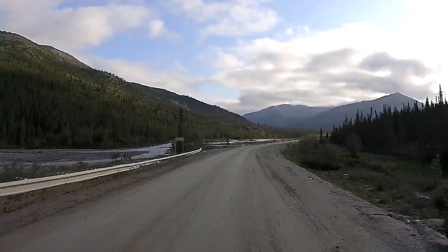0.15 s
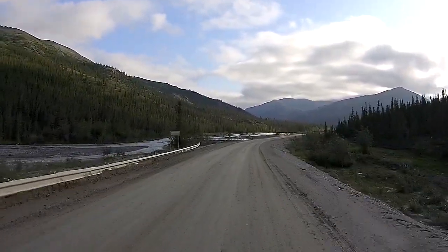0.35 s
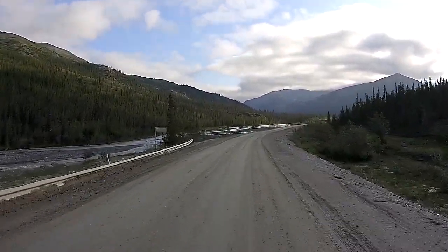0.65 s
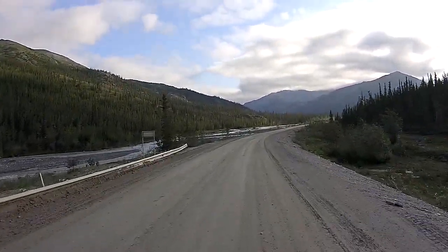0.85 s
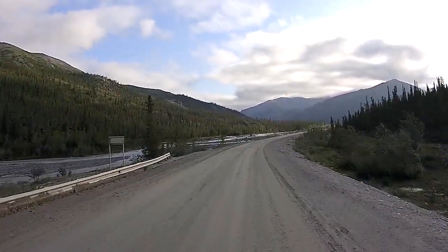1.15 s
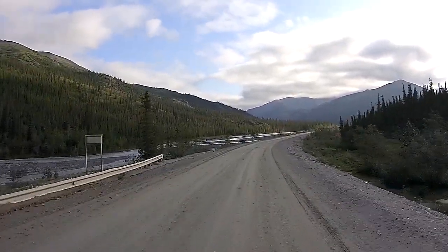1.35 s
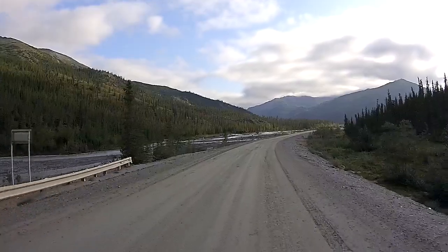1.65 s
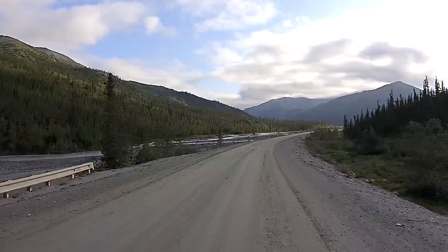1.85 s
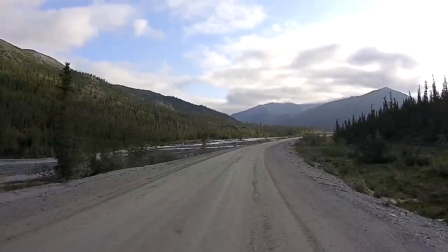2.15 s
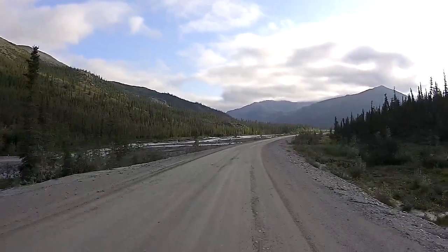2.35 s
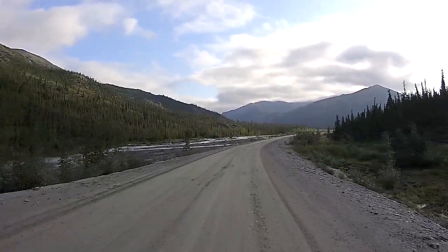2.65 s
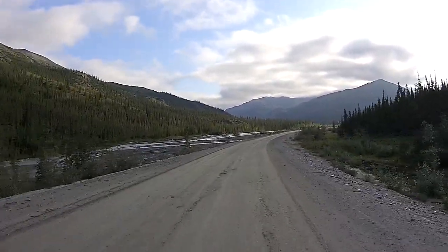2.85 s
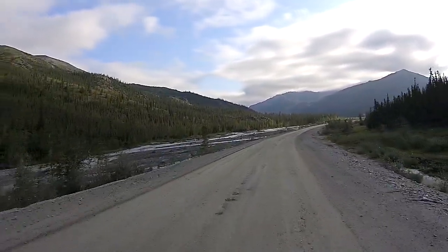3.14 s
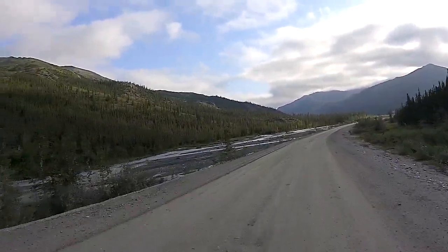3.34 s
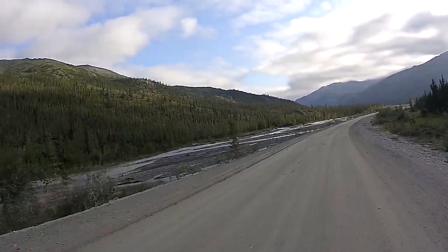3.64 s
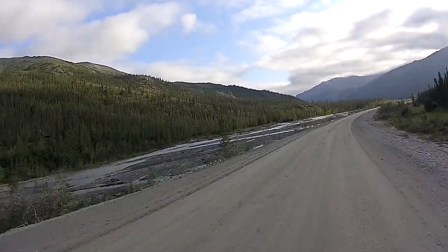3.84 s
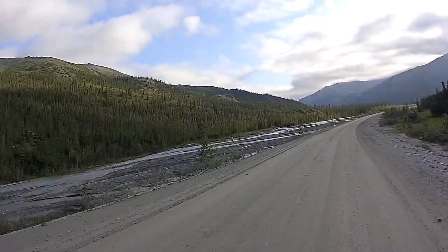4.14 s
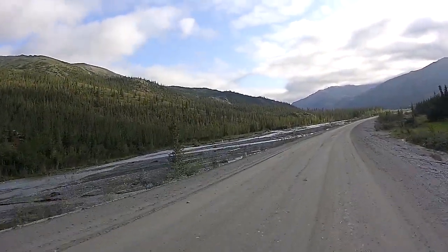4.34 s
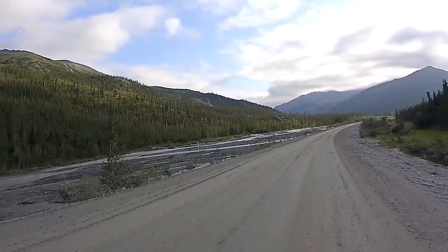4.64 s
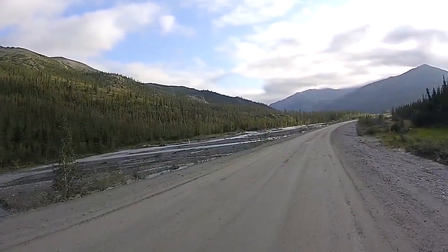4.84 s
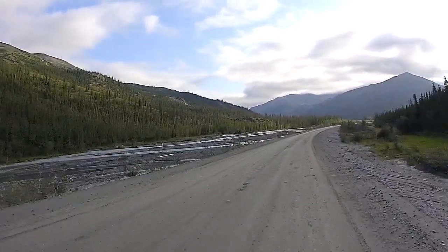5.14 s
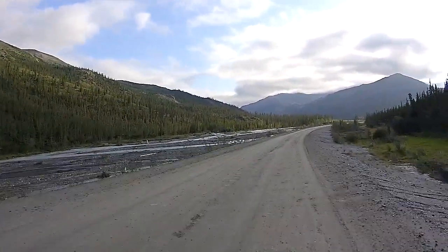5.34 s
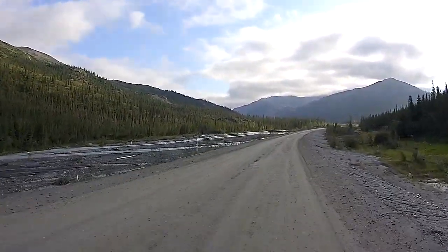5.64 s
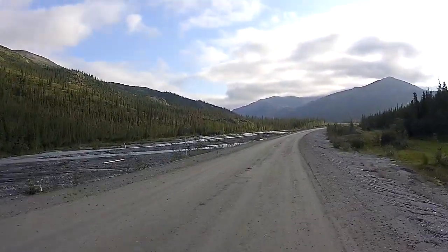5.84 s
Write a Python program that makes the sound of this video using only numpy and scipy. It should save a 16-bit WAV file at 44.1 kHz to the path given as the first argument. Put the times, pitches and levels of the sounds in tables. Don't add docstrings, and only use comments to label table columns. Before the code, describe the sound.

A vehicle rolls on a gravel road: bright gritty crunching and stone ticks, a brief quiet gap, then renewed crackling.

```python
import sys
import numpy as np
from scipy import signal
from scipy.fft import rfft, irfft
from scipy.io import wavfile
from scipy.ndimage import uniform_filter1d

SR = 44100
rng = np.random.default_rng(int(sys.argv[2]) if len(sys.argv) > 2 else 0)


def decibels_to_gain(level_db):
    exponent = np.asarray(level_db, float) / 20
    return 10 ** exponent


def waveform_to_disk(signal):
    frames = np.transpose(np.atleast_2d(signal))
    scaled = np.clip(frames, -1, 1) * 32767
    samples = np.round(scaled).astype(np.int16)
    wavfile.write(sys.argv[1], SR, samples)


N = 264157

# time_s [s], level_db [dB]
GRAVEL_DEPTH = [(0.0, -33), (0.2, -31.5), (0.3, -29.5), (0.72, -30), (0.96, -31), (1.35, -30), (1.9, -31.5),
                (2.8, -30), (3.26, -31.5), (3.45, -44), (3.7, -50.5), (4.1, -63), (4.4, -63), (4.5, -54.5),
                (4.92, -46), (5.06, -40), (5.5, -35), (5.99, -35)]
# time_s [s], treble_lift_db [dB]
STONE_FINENESS = [(0, -0.8), (.9, -1.5), (1.4, -0.1), (3.2, -0.1), (3.6, 3), (4.2, -1), (4.7, -1.5),
                  (5.1, 1.5), (5.99, 1.5)]
# start_s [s], lift_db [dB]
GRAVEL_RIDGES = [(.02, 5.5), (.28, 0.5), (.56, 3), (.67, 3.5), (.87, 2), (1.0, 3.5), (1.075, 5),
                 (1.11, -0.5), (1.18, 4), (1.39, -1.5), (1.5, 1.5), (1.67, 2.5), (1.78, 2), (1.94, 2),
                 (2.03, 1), (2.17, 2), (2.37, 0.5), (2.6, 1), (2.71, 1.5), (2.93, 0.5), (3.24, 1),
                 (5.56, 4), (5.69, 1), (5.845, 2.5)]
# start_s [s], lift_db [dB]
LOOSE_PATCHES = [(3.39, 1), (3.53, 2.5), (3.59, 2.5), (3.63, 1.5), (3.78, 5), (3.88, 4), (3.98, 5),
                 (4.45, 7.5), (4.585, 6), (4.615, 3), (4.655, 7), (4.69, 2.5), (4.73, 2.5), (4.86, 0.5),
                 (4.948, 7.5), (5.055, 6), (5.165, 1), (5.395, 2), (5.94, 2)]
# frequency_hz [Hz], density_db [dB per Hz]
CASE_COLOUR = [(180, -70), (300, -30), (872, -21.5), (1270, -13), (1570, -13.5), (2990, -0.5), (3410, 0.5),
               (4150, -1), (6150, -10), (7490, -18.5), (10900, -41.5), (11800, -42.5), (15200, -45)]
# frequency_hz [Hz], density_db [dB per Hz]
THIN_COLOUR = [(180, -54), (300, -19), (569, -12.5), (978, -11.5), (1890, -8), (4150, -1.5), (6050, -3),
               (7870, -11), (10600, -30), (15200, -31)]
# start_s [s], peak_db [dB], pitch_hz [Hz]
DEEP_STONES = [(0.0248, -16, 3800), (0.286, -19, 3250), (0.398, -11, 3170), (0.4813, -9.5, 3470),
               (0.5466, -18, 3610), (0.5763, -17, 3870), (0.683, -10, 3250), (0.6865, -12, 3250),
               (0.711, -9, 3660), (0.779, -11, 3150), (0.818, -7, 3360), (0.97, -9.5, 3180),
               (0.9795, -9, 3310), (1.0206, -13, 3210), (1.089, -16, 3290), (1.1735, -8, 4170),
               (1.2002, -12, 3330), (1.4325, -12, 3030), (1.687, -16, 3860), (1.8313, -30, 3540),
               (2.092, -11, 3440), (2.2282, -15, 4000), (2.2454, -10, 3440), (2.2852, -15, 3800),
               (2.374, -15, 3500), (2.7077, -10, 3060), (2.8765, -13, 3860), (2.9395, -12, 2940),
               (2.989, -12, 3340)]
# start_s [s], peak_db [dB], pitch_hz [Hz]
STRAY_STONES = [(3.337, -19, 4590), (3.363, -30, 4160), (3.4758, -27, 3240), (3.536, -29, 5120),
                (3.564, -26, 3950), (3.594, -18, 4800), (3.623, -26, 3920), (3.684, -32, 3770),
                (3.7352, -28, 4790), (3.8947, -27.5, 5380), (4.4503, -33, 2600), (4.5835, -25, 4150),
                (4.6192, -30, 4100), (4.662, -28, 4300), (4.6827, -23, 4230), (4.735, -21.5, 3300),
                (4.8326, -33, 5700), (4.87, -27, 2930)]
# start_s [s], peak_db [dB], pitch_hz [Hz]
RETURN_STONES = [(4.9515, -16, 5230), (4.997, -29, 3090), (5.065, -16, 3940), (5.0894, -25, 3480),
                 (5.1084, -20, 3930), (5.1702, -10.5, 4280), (5.215, -17, 2920), (5.358, -14.5, 3900),
                 (5.3998, -11.5, 4100), (5.446, -26, 3780), (5.468, -14, 3970), (5.5114, -19, 3550),
                 (5.569, -14, 4200), (5.689, -10, 4000), (5.704, -12, 4000), (5.73, -19, 4500),
                 (5.7604, -14, 3900), (5.8242, -24, 3510), (5.848, -16, 4330), (5.8685, -23, 4200)]
# start_s [s], lift_db [dB]
GRIT_SPRAYS = [
    (.585, 2),
    (.71, 2),
    (.815, -2),
    (1.115, 12),
    (1.95, 7),
    (2.09, 3),
    (2.74, -2),
    (3.595, 10),
    (5.165, 8),
]
# start_s [s], peak_db [dB], pitch_hz [Hz], t60_s [s], low_edge_hz [Hz]
CASE_KNOCKS = [
    (.648, -28, 1300, .003, 800),
    (.6795, -21, 1500, .003, 750),
    (3.2935, -29, 1300, .003, 800),
    (3.7517, -34.5, 560, .004, 90),
]
# time_s [s], pitch_hz [Hz]
NINTH_ORDER = [(0, 259.4), (.65, 261.7), (1.4, 262.2), (1.6, 263), (2.7, 257), (3.4, 256.3), (3.8, 255.4),
               (5.5, 259.2), (5.99, 257)]
# frequency_hz [Hz], density_db [dB per Hz]
RUMBLE_COLOUR = [(8, 3), (25, -8.5), (60, -1), (134, -1), (230, 1.5), (300, -1.5), (500, -12), (900, -30),
                 (2000, -90)]
# pitch_hz [Hz], width_hz [Hz], level_db [dB]
BODY_PANELS = [
    (68, 32, 2.5),
    (162.3, 20, 3),
]
# start_s [s], rumble_lift_db [dB]
WHEEL_BUMPS = [(.05, 3), (.8, 11), (1.07, 3), (1.47, 7), (1.93, 8), (3.52, 9), (3.58, 6), (3.82, 6),
               (3.88, 5), (4.1, 5), (5.55, 4), (5.9, 1)]
# frequency_hz [Hz], density_db [dB per Hz]
AIR_COLOUR = [(240, -28), (400, -12), (651, -11), (1080, -6.5), (1670, -11), (2640, -3.5), (2980, -3),
              (6280, -7), (10900, -32), (15200, -30)]

DEEP_DB, THIN_DB = -31.5, -50.5
HUM_DB, RUMBLE_DB = -73, -66.5
GAIN_OPENS_DB = 4


def rms_one(x):
    return x / np.sqrt(np.mean(x ** 2) + 1e-20)


def in_time(rows):
    time_s, *columns = np.transpose(rows)
    return [np.interp(np.arange(N) / SR, time_s, column) for column in columns]


def coloured(x, points):
    spectrum = rfft(x)
    hz = np.arange(N // 2 + 1) * SR / N + 1
    own = np.sqrt(uniform_filter1d(np.abs(spectrum) ** 2, size=3001))
    point_hz, point_db = np.transpose(points)
    wanted = decibels_to_gain(np.interp(np.log(hz), np.log(point_hz), point_db))
    return rms_one(irfft(spectrum / own * wanted, N))


def drift(rate_hz):
    r = np.exp(-2 * np.pi * rate_hz / SR)
    noise = rng.standard_normal(N + SR)
    return rms_one(signal.lfilter([1], [1, -2 * r, r * r], noise)[SR:])


def ring(clicks, hz, t60_s):
    r = decibels_to_gain(-60 / (t60_s * SR))
    w = 2 * np.pi * hz / SR
    return signal.lfilter([0, np.sin(w)], [1, -2 * r * np.cos(w), r * r], clicks + 1e-18)


def resonance(x, hz, width_hz):
    r = np.exp(-np.pi * width_hz / SR)
    top = np.array([1, 0, -1]) * (1 - r * r) / 2
    return signal.lfilter(top, [1, -2 * r * np.cos(2 * np.pi * hz / SR), r * r], x)


def butter(x, order, hz, kind):
    return signal.sosfilt(signal.butter(order, hz, kind, fs=SR, output="sos"), x)


def butter_even(x, hz, kind):
    return signal.sosfiltfilt(signal.butter(2, hz, kind, fs=SR, output="sos"), x)


def swells(rows, rise_s, fade_s):
    start_s, lift_db = np.transpose(rows)[:, :, None]
    since = np.maximum(np.arange(0, N + 32, 32) / SR - start_s, 0)
    shape = (1 - np.exp(-since / rise_s)) * np.exp(-since / fade_s) * 1.6
    return np.repeat((lift_db * shape).sum(axis=0), repeats=32)[:N]


def crackle(level_db, brightness_db):
    deep = np.clip((level_db - THIN_DB) / (DEEP_DB - THIN_DB), 0, 1)
    clumps_db = 0.87 * drift(42) + 2.3 * drift(155)
    clumps = decibels_to_gain(clumps_db * (0.5 - 0.5 * deep))

    cracks_per_s = 3500.0 * (0.3 + 0.7 * deep)
    born = rng.random(N) < cracks_per_s / SR
    sizes = decibels_to_gain(2.5 * np.minimum(rng.exponential(1, N), 4.2))
    sizes = sizes * rng.choice([-1, 1], N) / np.sqrt(0.53 + 0.4 * deep)
    pitches_hz = np.geomspace(900, 12000, num=10)
    dealt = rng.integers(0, 10, N)
    small = 0
    for k, hz in enumerate(pitches_hz):
        small = small + rms_one(ring(sizes * born * (dealt == k), hz, 2.2 / hz))

    dust = 0.4 * rng.standard_normal(N)
    cracks = clumps * (rms_one(small) + dust)
    cracks = cracks / np.sqrt(uniform_filter1d(cracks ** 2, size=2600))
    heard = deep * coloured(cracks, CASE_COLOUR) + (1 - deep) * coloured(cracks, THIN_COLOUR)
    low = butter_even(heard, 3500, "low")
    top = butter_even(heard, 7000, "high")
    middle = heard - low - top
    return decibels_to_gain(level_db) * (low * decibels_to_gain(-brightness_db) + middle * decibels_to_gain(brightness_db) + top)


def sprays(gravel):
    top = butter_even(gravel, 7000, "high")
    return top * (decibels_to_gain(swells(GRIT_SPRAYS, rise_s=0.004, fade_s=0.016)) - 1)


def stones():
    rows = [(*row, 0.0057) for row in DEEP_STONES]
    rows += [(*row, 0.005) for row in STRAY_STONES + RETURN_STONES]
    length = 1500
    out = np.zeros(N + length)
    since = np.arange(length) / SR
    for start_s, peak_db, hz, splinter_s in rows:
        blow = 0.16 * rng.laplace(size=length) * np.exp(-since / splinter_s)
        blow[0] = 0.51
        at = round(start_s * SR)
        out[at:at + length] += decibels_to_gain(peak_db - 6.0) * ring(blow, hz, 4.2 / hz)
    return butter(out[:N], 3, [1700, 7000], "band")


def knock():
    out = 0
    for start_s, peak_db, hz, t60_s, edge_hz in CASE_KNOCKS:
        push = np.exp(-((np.arange(N) / SR - start_s) / 0.0001) ** 2)
        blow = decibels_to_gain(peak_db) * ring(push / push.sum(), hz, t60_s) * 1.5
        out = out + butter(blow, 3, edge_hz, "high")
    return out


def engine(ninth_hz, hum_db, open_db):
    turns = np.cumsum(ninth_hz / 9) / SR
    hum_level = np.sqrt(2) * decibels_to_gain(hum_db + 0.9 * drift(1.5))
    hum = hum_level * np.sin(18 * np.pi * turns + 0.49 * drift(4.0))

    throb = 1 + 0.27 * np.cos(2 * np.pi * turns) + 0.5 * np.cos(4 * np.pi * turns)
    throb = throb + 0.84 * np.cos(6 * np.pi * turns)
    mesh_order = 91.8
    whine = throb * np.sin(2 * np.pi * mesh_order * turns + 0.4 * drift(5))

    rattle_hz = 2590
    shaken = rng.standard_normal(N) * decibels_to_gain(1.6 * drift(60))
    rattle = rms_one(resonance(resonance(shaken, rattle_hz, 260), rattle_hz, 600))
    return hum + decibels_to_gain(open_db) * (decibels_to_gain(-1) * whine + decibels_to_gain(-3.5) * rattle)


def road(rumble_db):
    shake = coloured(rng.standard_normal(N) * decibels_to_gain(0.5 * drift(31)), RUMBLE_COLOUR)
    body = shake
    for hz, width_hz, panel_db in BODY_PANELS:
        body = body + decibels_to_gain(panel_db) * resonance(shake, hz, width_hz)
    return decibels_to_gain(rumble_db) * rms_one(body)


def air_rush(level_db):
    return decibels_to_gain(level_db) * coloured(rng.standard_normal(N) * decibels_to_gain(0.7 * drift(50)), AIR_COLOUR)


def scene():
    [level_db] = in_time(GRAVEL_DEPTH)
    [brightness_db] = in_time(STONE_FINENESS)
    [ninth_hz] = in_time(NINTH_ORDER)

    thin = np.clip((DEEP_DB - level_db) / (DEEP_DB - THIN_DB), 0, 1)
    gain_db = GAIN_OPENS_DB * uniform_filter1d(thin, size=int(0.08 * SR) + 1)
    open_db = RUMBLE_DB + uniform_filter1d(gain_db, size=44000)

    level_db = level_db + swells(LOOSE_PATCHES, rise_s=0.013, fade_s=0.03)
    level_db = level_db + swells(GRAVEL_RIDGES, rise_s=0.012, fade_s=0.025)
    gravel = crackle(level_db, brightness_db)
    foreground = gravel + sprays(gravel) + stones() + knock()

    hum_db = HUM_DB + 0.66 * gain_db + 2.6 * drift(18.0)
    rumble_db = RUMBLE_DB + gain_db + swells(WHEEL_BUMPS, rise_s=0.014, fade_s=0.024)
    background = engine(ninth_hz, hum_db, open_db) + road(rumble_db) + air_rush(open_db + 7.5)
    return (foreground + background)[None]


def top_cut(x):
    return signal.sosfilt(signal.butter(12, 15320, fs=SR, output="sos"), x)


def record(dry):
    return top_cut(dry)


dry = scene()
out = record(dry)
waveform_to_disk(out)
```